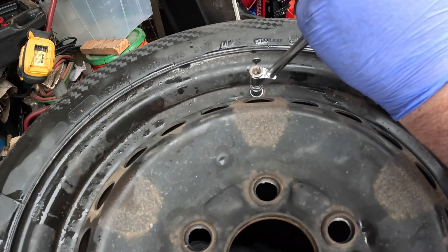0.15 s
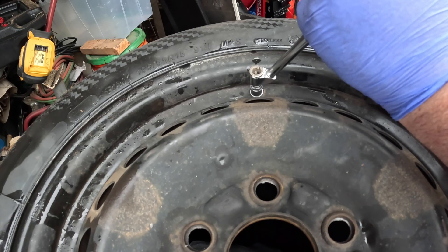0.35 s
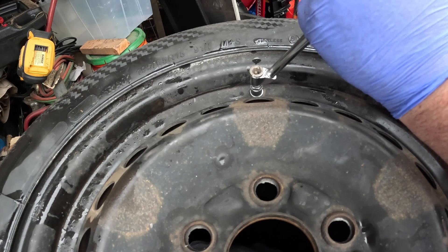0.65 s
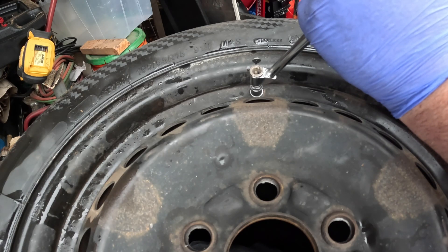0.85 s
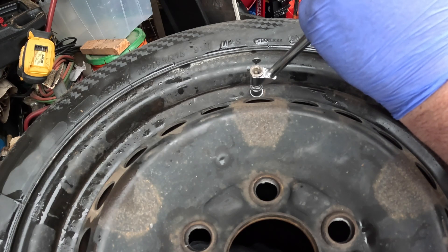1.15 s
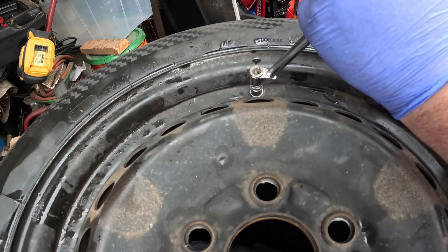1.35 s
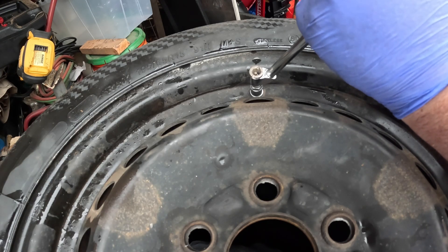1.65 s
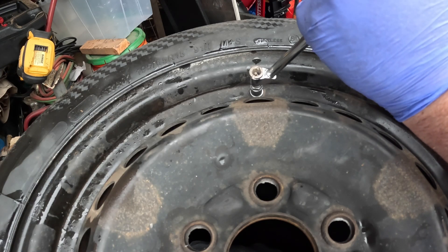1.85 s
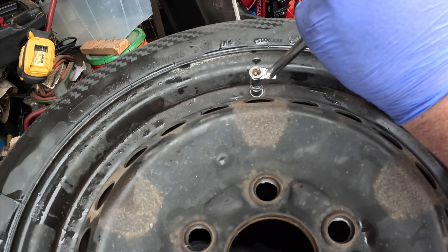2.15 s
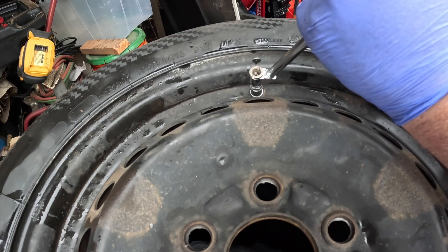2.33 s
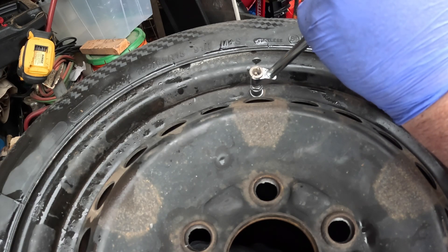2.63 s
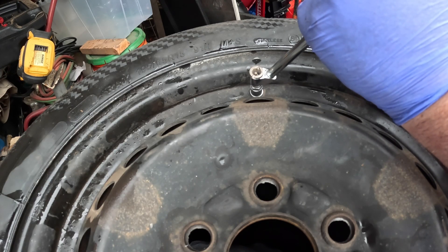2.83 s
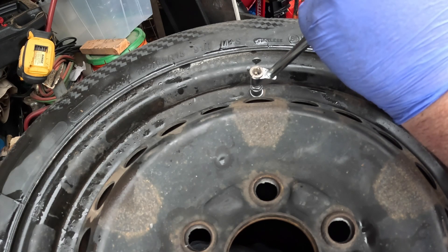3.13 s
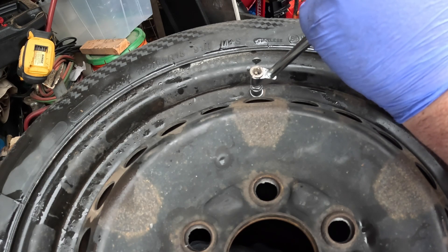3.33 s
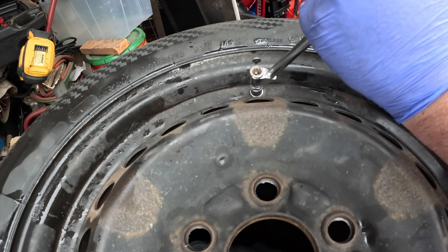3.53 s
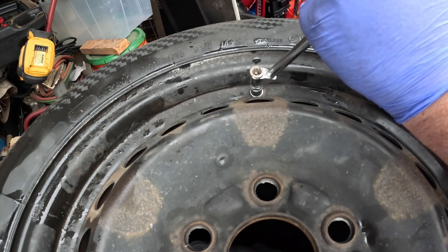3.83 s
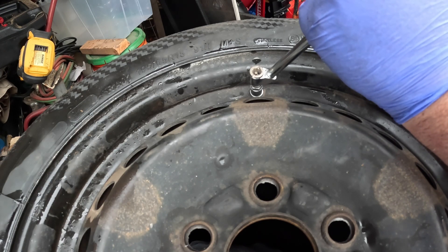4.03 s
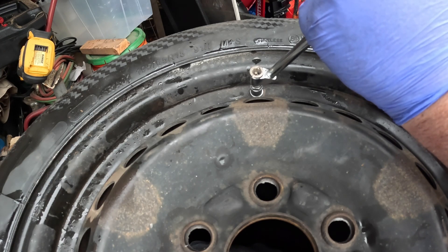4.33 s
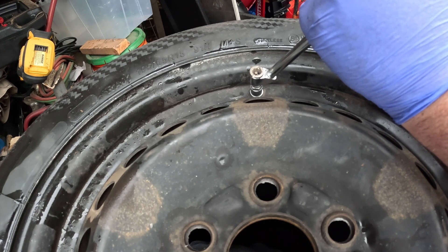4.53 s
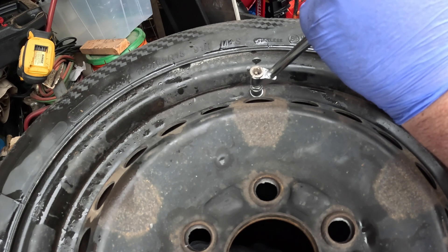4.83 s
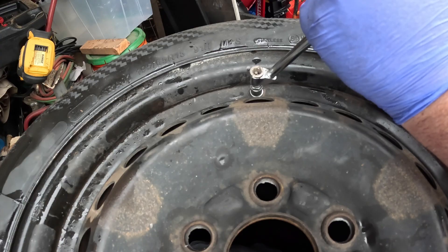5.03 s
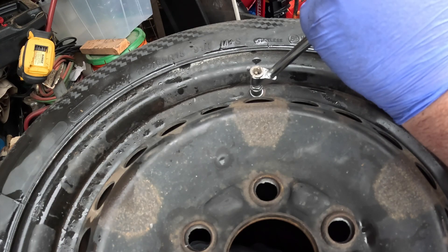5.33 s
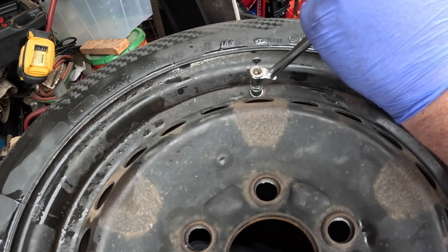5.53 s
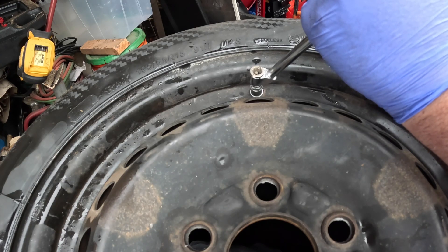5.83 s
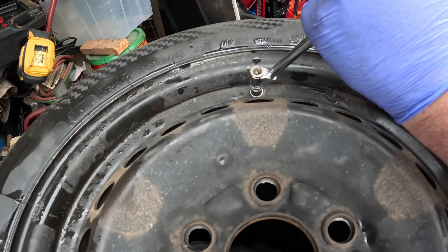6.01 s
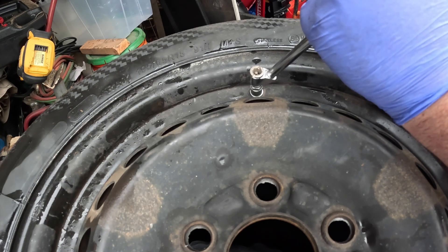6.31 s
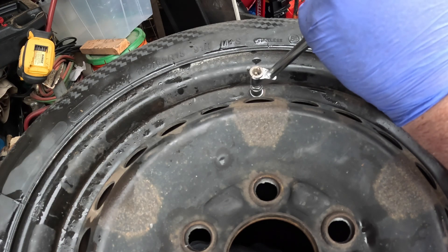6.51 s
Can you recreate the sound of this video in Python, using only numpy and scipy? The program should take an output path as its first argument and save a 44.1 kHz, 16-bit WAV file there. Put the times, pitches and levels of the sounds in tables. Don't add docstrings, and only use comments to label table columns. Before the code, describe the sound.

Close-up tyre inflation: a held hiss cuts off, then two long squeezes, a short one and a quick tap, with birds chirping far away between.

```python
import sys
import numpy as np
from scipy import signal
from scipy.fft import rfft, irfft, next_fast_len
from scipy.io import wavfile

SR = 44100
rng = np.random.default_rng(int(sys.argv[2]) if len(sys.argv) > 2 else 0)


def persist_wave(psi):
    counts = np.round(np.clip(psi, -1, 1) * 32767).astype(np.int16)
    wavfile.write(sys.argv[1], SR, np.atleast_2d(counts).T)


def to_linear_factor(level_db):
    exponent = np.asarray(level_db, float) / 20
    return 10 ** exponent


N = 294147
FREQS = np.fft.rfftfreq(N, 1 / SR)
T = np.arange(N) / SR


def curve(points):
    hz, db = np.transpose(points)
    return to_linear_factor(np.interp(np.log(FREQS + 1), np.log(hz), db))


def noise(gain):
    x = irfft(rfft(rng.standard_normal(N)) * gain, N)
    return x / np.sqrt(np.mean(x ** 2))


def ring(hz, width_hz):
    return 1 / np.sqrt(1 + (2 * (FREQS - hz) / width_hz) ** 2)


def walk(rate_hz, size=N):
    n = next_fast_len(size, True)
    slow = 1 / (1 + (np.fft.rfftfreq(n, 1 / SR) / rate_hz) ** 2)
    x = irfft(rfft(rng.standard_normal(size), n) * slow, n)[:size]
    return x / x.std()


def swell(start, hold, rise_ms, t60, t=T):
    up = np.clip((t - start) * 1000 / rise_ms, 0, 1)
    since_end = np.clip(t - start - hold, 0, 5)
    return up ** 2 * np.exp(-np.log(1000) * since_end / t60)


# (open [s], let go [s], flow level [dB], flow change while held [dB])
SQUEEZES = [
    (-.1, 0.493, -38.5, .5),
    (1.069, 2.418, -38, 0.5),
    (3.015, 4.2, -38, -1),
    (4.885, 5.378, -38.5, 0.6),
    (6.042, 6.135, -40, -1.5),
]
# (pitch [Hz], level [dB per Hz])
JET = [(300, -43.5), (500, -23.5), (1000, -16.5), (1800, -15.5), (2600, -16.5), (3300, -14), (4700, -8),
       (5900, -16), (7200, -12), (8600, -14.5), (10500, -15.5), (12500, -10), (13500, -20), (14500, -15.5)]
# (pitch [Hz], width [Hz], level [dB])
RESONANCES = [(1014, 36, -9), (1059, 20, -1),
              (1643, 60, -19.5), (2126, 120, -13), (2600, 170, -8), (2777, 150, -8.5), (3077, 71, -12),
        (3594, 200, -14.5), (4172, 140, -8.5), (4530, 130, -19), (4794, 96, -3), (5370, 120, -11.5),
        (5800, 110, -14), (6450, 210, -10), (6700, 150, -22.5), (7010, 170, -7), (7460, 140, -6),
        (8050, 90, -11.5), (8660, 86, -15), (9510, 120, -14), (10270, 170, -14), (12240, 1400, -11.5)]


def filling():
    jet_db, bleed_db = -7, -12.5
    open_ms, shut_t60_s = 18, .076
    seat_lag_s, seat_t60_s = .026, .14
    jet_top = 1 / (1 + (FREQS / 13800) ** 80)

    air = irfft(to_linear_factor(jet_db) * curve(JET) * rfft(rng.standard_normal(N)), N)
    for hz, width_hz, db in RESONANCES:
        band = irfft(rfft(rng.standard_normal(N)) * ring(hz, 1.55 * width_hz) ** 2, N)
        air = air + to_linear_factor(db + 1.6 * walk(3.2)) * band
    air = irfft(rfft(air) * jet_top, N)

    flow = bleed = 0
    for opens, let_go, db, change_db in SQUEEZES:
        drift = to_linear_factor(np.interp(T, [opens, let_go], [db, db + change_db]))
        flow = flow + swell(opens, let_go - opens, open_ms, shut_t60_s) * drift
        leak = swell(let_go - .01, .01 + seat_lag_s, 10, seat_t60_s)
        bleed = bleed + leak * to_linear_factor(db + change_db + bleed_db)
    toneless = noise(curve(JET) * jet_top)
    return (air / np.std(air) * flow + toneless * bleed) * to_linear_factor(.5 * walk(20))


# (pitch [Hz], level [dB per Hz])
SHOP = [(12, -72.5), (20, -27), (64, -0.5), (98, -5), (140, -2.5), (289, -6.5), (478, -17.5), (746, -17.5),
        (932, -22.5), (2090, -31), (3350, -41), (5380, -47.5), (9130, -64.5), (12100, -59.5), (15500, -75)]
# (time [s], level [dB])
BUSTLE = [(0, 0), (.55, 1.3), (.65, 0), (.9, 1.2), (1.75, -1.5), (2.3, 0.5), (2.9, -0.4), (3.75, -1.5),
          (4.4, 2), (4.7, 0.8), (5.45, 2), (5.9, 1.2), (6.22, -3), (6.67, 0.7)]
# (time [s], level [dB])
GUSTS = [
    (.66, 3),
    (.93, 4.5),
    (2.8, 8),
    (4.82, 3),
    (6.35, 2.6),
]


def shop():
    shop_db, wash_db, leaf_db = -49, -.35, -3.8
    wash_grows_db_s, wash_share = .5, .4
    gust_s = .074

    bustle_db = np.interp(T, *np.transpose(BUSTLE))
    whole = rfft(noise(curve(SHOP)))
    low = 1 / (1 + (FREQS / 500) ** 4)
    high = 1 - 1 / (1 + (FREQS / 4000) ** 6)

    rumble = irfft(whole * low, N) * to_linear_factor(bustle_db + .27 * walk(4.6) + 1.5 * walk(25))
    wash_level = wash_db + wash_grows_db_s * T + wash_share * bustle_db + 1.3 * walk(8)
    wash = irfft(whole * (1 - low - high), N) * to_linear_factor(wash_level)
    gusts_db = sum(db * np.exp(-((T - s) / gust_s) ** 2) for s, db in GUSTS)
    leaves = irfft(whole * high, N) * to_linear_factor(leaf_db + gusts_db + .7 * walk(8))
    return to_linear_factor(shop_db) * (rumble + wash + leaves)


# (time [s], level [dB], pitch [Hz], t60 [s])
THUMPS = [
    (.519, -40.5, 142, 0.23),
    (1.088, -34.5, 312, 0.03),
    (2.426, -58, 123, 0.12),
    (3.0298, -25.5, 228, 0.039),
    (3.029, -29, 393, 0.036),
    (4.196, -38, 171, 0.084),
    (4.901, -28.5, 268, 0.021),
    (6.05, -25.5, 257, 0.023),
]


def thumps():
    out = 0
    for s, db, hz, t60 in THUMPS:
        out = out + to_linear_factor(db) * swell(s, .00078, 1, t60) * np.sin(2 * np.pi * hz * (T - s))
    return out


# (time [s], level [dB], pitch [Hz])
TICKS = [(0.521, -44, 2230), (.529, -51, 2700), (.796, -56, 895), (1.055, -70, 5500), (2.456, -53, 3200),
         (4.832, -55, 2400), (5.401, -40.5, 2660), (5.791, -70, 4960), (5.99, -48, 4500),
         (6.052, -40.5, 2100), (6.302, -93, 6460), (6.447, -72, 6700)]


def ticks():
    tick_t60_s, crack_db = .022, -1.5
    white = rfft(rng.standard_normal(N))
    out = 0
    for s, db, hz in TICKS:
        body = swell(s, 0, .72, tick_t60_s) * np.sin(2 * np.pi * hz * (T - s))
        crack = irfft(white * ring(hz, 2400) ** 3, N)
        crack = swell(s, .002, .5, .02) * crack / crack.std()
        out = out + to_linear_factor(db) * (body + to_linear_factor(crack_db) * crack)
    return out


def call(s, length, hz0, hz1, db, blur_hz):
    echo_db, echo_t60_s = -8.5, .45
    t = T[:SR]
    phase = 2 * np.pi * np.cumsum(np.interp(t, [0, length], [hz0, hz1])) / SR

    def smeared(more_hz):
        rate_hz = blur_hz + more_hz
        return walk(rate_hz, SR) * np.cos(phase) + walk(rate_hz, SR) * np.sin(phase)

    direct = 28 / blur_hz * np.cos(phase) * swell(0, length, 7, .04, t)
    near_echo = .95 * smeared(20) * swell(0, length, 9, .06, t)
    far_echo = to_linear_factor(echo_db) * smeared(130) * swell(0, length, 12, echo_t60_s, t)
    sound = to_linear_factor(db) * (direct + near_echo + far_echo)
    return np.concatenate([np.zeros(int(s * SR)), sound, np.zeros(N)])[:N]


# (time [s], length [s], start pitch [Hz], end pitch [Hz], level [dB])
BIRDS = [(1.048, 0.03, 3700, 3500, -60), (1.77, .06, 3600, 3600, -51), (1.878, 0.055, 3600, 3640, -56),
         (5.413, 0.021, 3810, 3530, -53), (5.468, .25, 7330, 7350, -98.5), (5.443, .02, 7150, 7300, -69),
         (5.585, 0.023, 7450, 7380, -76), (5.56, 0.026, 3780, 3500, -57.5),
         (5.625, 0.017, 4600, 4800, -80.5), (5.61, 0.05, 3050, 2950, -76), (5.665, 0.1, 4830, 4890, -63),
         (5.779, .022, 2970, 2620, -54.5), (5.813, 0.04, 4850, 4800, -65),
         (5.846, 0.082, 4780, 4820, -64.5), (5.941, .025, 3390, 3720, -52.5),
         (5.963, 0.11, 3610, 3480, -52), (6.097, 0.16, 3500, 3540, -76), (6.595, 0.045, 5150, 5020, -76),
         (6.617, .018, 3440, 3800, -61.5), (6.638, .02, 3840, 3870, -79)]
# (time [s], length [s], start pitch [Hz], end pitch [Hz], level [dB])
RASP = (6.219, .026, 5550, 5450, -55)


def birds():
    out = call(*RASP, blur_hz=300)
    for s, length, hz0, hz1, db in BIRDS:
        blur_hz = 14 + .004 * abs(hz1 - hz0) / length
        out = out + call(s, length, hz0, hz1, db, blur_hz)
    return out


def valve():
    return sum(swell(a - .02, b - a + .02, 2, .08) for a, b, *_ in SQUEEZES)


# (time [s], level [dB], t60 [s], broad hiss over gap whistle [dB])
SPITS = [(1.068, -59.5, .29, 5.5), (1.086, -33, .05, 4.5), (1.099, -29.5, 0.12, -10.5),
         (1.183, -31.5, 0.13, 0), (1.202, -39.5, .15, -10), (1.219, -36.5, 0.23, -3),
         (3.028, -28, 0.06, 1.3), (3.045, -32.5, 0.039, -11.5), (4.9, -32, 0.12, 2), (5.369, -39, 0.023, 2),
         (6.033, -54.5, 0.24, 4.5), (6.044, -30.5, 0.18, 1.5), (6.062, -19, 0.076, -10),
         (6.074, -29, 0.063, -3), (6.088, -28, 0.033, -7), (6.106, -44.5, 0.66, 4.5)]
# (pitch [Hz], level [dB])
SEAL = [(200, -37.5), (1500, -8.5), (2500, -1.5), (3500, -1.5), (5200, -1), (8000, -8.5), (10000, -2),
        (12000, 3), (14000, -8.5), (16000, -9)]


def spitting():
    rise_ms = 5
    broad = noise(curve(SEAL))
    gap = noise(ring(7180, 1000) ** 2)
    flutter = to_linear_factor(.43 * walk(180))
    out = 0
    for s, db, t60, hiss_db in SPITS:
        puff = swell(s, rise_ms / 1000, rise_ms, t60)
        out = out + to_linear_factor(db) * puff * (gap + to_linear_factor(hiss_db) * broad)
    return out * flutter * valve()


def scene():
    room_t60_s, room_db = .24, -22
    near = filling() + thumps() + ticks() + spitting()
    tail = rng.standard_normal(SR // 2) * to_linear_factor(-60 * T[:SR // 2] / room_t60_s)
    wet = signal.fftconvolve(near, tail / np.linalg.norm(tail))[:N]
    mono = near + to_linear_factor(room_db) * wet + birds() + shop()
    return np.array([mono, mono])


def shape(x, response):
    kernel = np.fft.fftshift(irfft(response, N))[N // 2 - 2048:N // 2 + 2049]
    return signal.fftconvolve(x, kernel * np.hanning(4097), "same")


def band_limit(x):
    return signal.sosfilt(signal.butter(12, 15680, fs=SR, output="sos"), x)


# (pitch [Hz], lead [radians])
PORTS = [(20, .04), (900, .04), (2000, .0), (11000, .0), (11400, .6), (12300, 1.5), (13200, 2.0),
         (14000, 2.3)]


def record(dry):
    mic_hiss_db, notch_depth, treble_lean = -93, .85, -.27
    heard = dry[0] + to_linear_factor(mic_hiss_db) * noise(ring(12700, 1200) ** 2)
    notch = 1 - notch_depth * ring(9030, 380) ** 2
    colour = notch / (1 + (FREQS / 14900) ** 30)
    half = np.interp(FREQS, *np.transpose(PORTS)) / 2
    scatter = signal.fftconvolve(rng.standard_normal(len(FREQS)), np.blackman(500), "same")
    turn = 1j * np.exp(1.3j * scatter / scatter.std())
    mid = shape(heard, colour * np.cos(half))
    side = shape(heard, colour * np.sin(half) * (turn + treble_lean))
    return band_limit(mid + np.array([side, -side]))


dry = scene()
out = record(dry)
persist_wave(out)
```